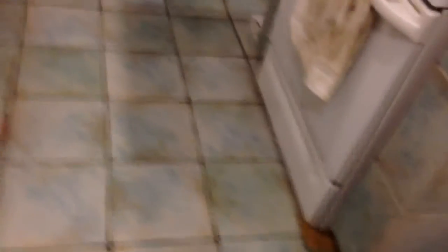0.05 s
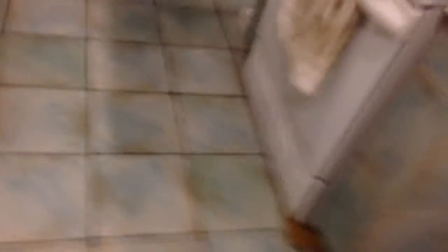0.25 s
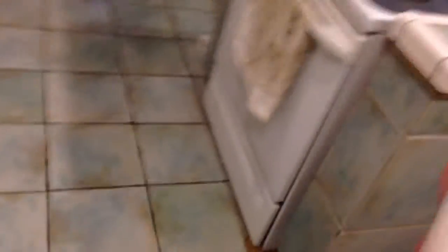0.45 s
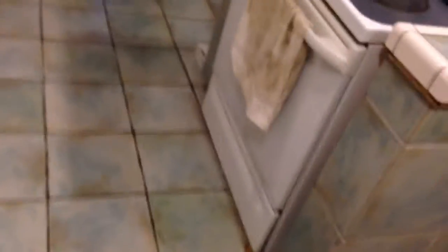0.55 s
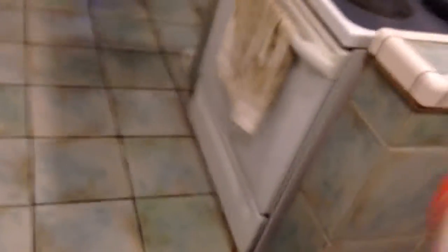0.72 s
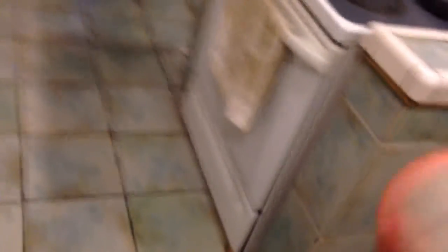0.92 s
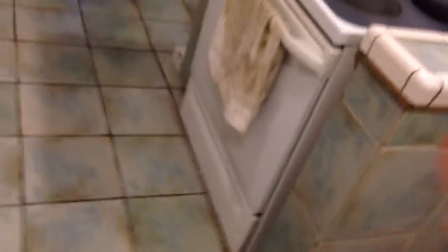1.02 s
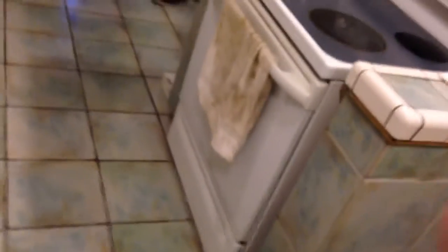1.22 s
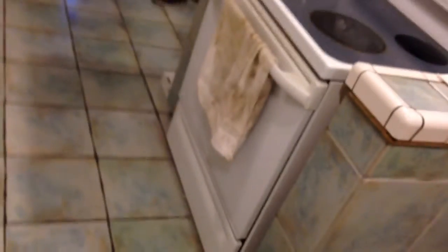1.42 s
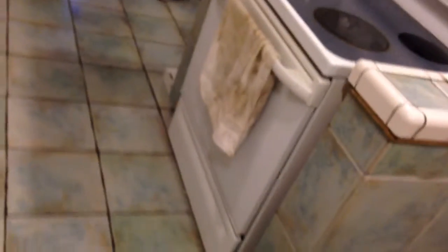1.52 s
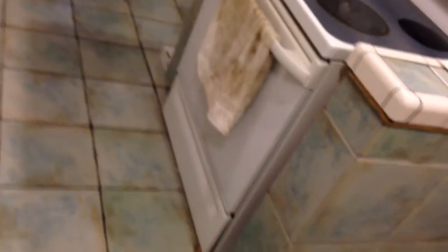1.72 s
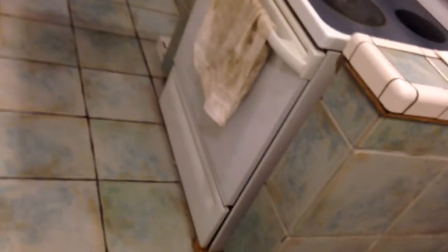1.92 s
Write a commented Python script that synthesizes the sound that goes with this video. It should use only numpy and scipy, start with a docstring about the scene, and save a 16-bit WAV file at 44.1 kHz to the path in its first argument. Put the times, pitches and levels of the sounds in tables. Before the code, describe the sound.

A plastic container is shaken close to the microphone in a tiled kitchen. After a scrape and soft bump, hard pieces clack and slide inside, over hand rubbing and hollow knocks. The rattle weakens and ends in faint clicks.

```python
"""A scrape and a soft bump open a burst of hard clacks: a plastic container shaken close to the
microphone in a tiled kitchen. Hard pieces inside strike the walls and ring them briefly, sliding and
skidding between blows. The hand rubs the hollow body, which knocks from the hand or under a hard clack.
The shaking stops and a last few faint clicks follow over the hush of the room."""
import sys
import numpy as np
from scipy import signal
from scipy.fft import rfft, irfft, next_fast_len
from scipy.io import wavfile

SR = 44100
rng = np.random.default_rng(int(sys.argv[2]) if len(sys.argv) > 2 else 0)


def waveform_to_disk(signal):
    """Save audio, clipped to [-1, 1], as 16-bit WAV at the path in sys.argv[1]."""
    frames = np.transpose(np.atleast_2d(signal))
    scaled = np.clip(frames, -1, 1) * 32767
    samples = np.round(scaled).astype(np.int16)
    wavfile.write(sys.argv[1], SR, samples)


N = 85995

# clacks on the wall (time [s], low and high resonance of the struck spot [Hz],
# level in each of the four CLACK_BANDS [dB], room send [dB]);
# the one at 0.308 s is mostly room ring after the loud clack
WALL_CLACKS = [(0.1198, 1775, 4140, -19.5, -21.5, -20.5, -42, 5.5),
               (0.1427, 1980, 4200, -19.5, -17, -12, -17.5, -17),
               (0.1651, 2050, 5500, -45, -18.5, -10.5, -16, -27),
               (0.175, 2230.0, 3930, -37, -21, -15.5, -21, -26),
               (0.2192, 1670, 4830.0, -25, -7, -1, -16, -30),
               (0.2267, 1610, 4900, -22.5, -10.5, -3, -8, -9.5),
               (0.2685, 1970, 4950, -36, 0.5, 2.5, -8, -6.5), (0.2699, 2180, 3735, -33, -0.5, 4.5, -1, -4),
               (0.2744, 2700, 3290, -21, 0.5, -12, -15, -6.5), (0.2761, 2740, 3330, -29, -16, -3, -14, -7),
               (0.308, 2390, 4220, -42, -11.5, -13, -24, 4),
               (0.3453, 2760, 5630, -19, -12, -10.5, -13.5, -24),
               (0.3748, 1900, 4140, -26, -12, -5.5, -12.5, -15),
               (0.4405, 1670, 4700, -38, -11, -8, -15.5, 0.5), (0.46, 1820, 4400, -35, -16, -8.5, -19, -9),
               (0.47, 2760, 5380.0, -47, -34, -21, -22, -8), (0.522, 2200, 4550, -44, -10, -5.5, -12, -6),
               (0.5466, 2550, 3700, -32.5, -3.5, -8.5, -12.5, -4.5),
               (0.5485, 1680, 3750, -21, -4.5, -10, -16, -2), (0.5594, 1650, 3500, -35, -9, -11, -21, -10),
               (0.568, 1380, 3760, -16, -11, -18, -19, -11), (0.6195, 2190, 5540.0, -19, 3, 10, 6, -14),
               (0.6312, 2220, 5320.0, -20.5, -9.5, -9.5, -12, -17),
               (0.691, 3260, 5750, -24, -9.5, -3, -8, -4.5),
               (0.7547, 2360, 3660, -61, -4.5, -8, -18.5, 0.5),
               (0.7642, 2570, 4460, -32, -8, -10.5, -18, -1.5),
               (0.78, 1700, 4830, -25, -37.5, -13, -18, 1.5), (0.8534, 1970, 4730, -18, 3.5, 5, 0.5, -13),
               (0.8608, 1780, 5950, -32, -11, -18, -16, -14),
               (0.9335, 2600, 4900, -29, -18, -7.5, -16, -14),
               (0.937, 1930, 4570, -23, -13, -11.5, -14.5, 0),
               (0.9773, 2180, 2320, -21, 0.6, -9.5, -13.5, -5.5),
               (0.9834, 2020, 4000, -25, -12, -10, -20, -0.5),
               (1.0407, 2110.0, 4000, -25.5, -18, -14, -13.5, -16),
               (1.0943, 1534, 6000, -24, -44, -19.5, -27, -13),
               (1.1148, 2470, 3400, -49, -13.5, -13, -20.5, 0.5),
               (1.1257, 2580, 3370, -26.5, -12, -7.5, -12.5, -17),
               (1.1517, 2070, 5800, -48, -15, -13.5, -15.5, -8.5),
               (1.2287, 2020, 4200, -31, -16, -13.5, -21.5, -39),
               (1.2483, 3190, 3730, -33, -10, -7.5, -17.2, -19),
               (1.252, 2630, 3940, -17.5, -7.5, -7.5, -15, -7),
               (1.2895, 1840, 4100, -29, -15.5, -18.5, -31, -11.5),
               (1.3283, 2570, 3500, -33, -17, -20.5, -18, -15),
               (1.3716, 1830, 5460, -36, -20.5, -18.5, -24.5, -26),
               (1.4021, 1960, 6100, -27, -23.5, -23, -47, -1.5),
               (1.5076, 2220, 2750, -32.5, -18, -19.5, -26.5, -5.5),
               (1.5523, 2095, 4610.0, -41.5, -36.5, -34, -39.5, 0.5),
               (1.823, 1840, 2960, -41.5, -35.5, -43, -52.5, -4.5)]
# body, knock, bite and air of a clack (low edge [Hz], high edge [Hz])
CLACK_BANDS = [(250, 850), (1400, 3200), (3200, 7000), (7000, 15000)]
# modes of the plastic wall (frequency [Hz], level [dB], t60 [s])
WALL_MODES = [(362, -26.5, 0.026), (506, -15, 0.018), (1458, -36, 0.0071), (1772, -8.5, 0.046),
              (2028, -5, 0.049), (2418, -10.5, 0.02), (3160, -14.5, 0.0028), (4490, -6.5, 0.0082),
              (5050, -1.5, 0.0038), (8000, -1, 0.0025), (9310, -0.5, 0.0032), (12000, -0.5, 0.0012)]
MODE_SCATTER_DB, TUNE_SCATTER = 2, 0.025
SPOT_DB, SPOT_T60_CYCLES = (11, 9), (15, 22)  # low and high resonance
SPOT_DB_PER_DB = 0.17  # harder blows ring the spot more
SNAP_DB, ROOM_SNAP_DB = 8.5, 18
CHATTER_DB, CHATTER_T60_S, CHATTER_PER_S = -8, 0.016, 5300

# contents sliding along the wall (start [s], length [s], level [dB])
SLIDE_STROKES = [(0, 0.03, -46.5), (.033, 0.025, -46), (.058, 0.046, -58.5), (.135, 0.079, -53),
                 (.222, 0.046, -42.5), (.278, .065, -41.5), (.345, 0.012, -43), (.442, 0.014, -38),
                 (.525, 0.042, -45.5), (.548, 0.034, -39.5), (.585, 0.042, -42), (.70, 0.15, -53),
                 (.94, 0.034, -53.5), (.995, 0.085, -48), (1.145, 0.021, -69), (1.2, 0.07, -49.5),
                 (1.255, 0.036, -45), (1.3, 0.038, -45.5), (1.37, 0.024, -55.5)]
# gritty tone of the scrape (frequency [Hz], gain [dB])
SCRAPE_EQ = [(200, -32), (900, -7.5), (1300, -2), (1800, 1), (2350, -1.5), (3000, -4.5), (4200, -4),
             (5500, -7.5), (7500, -15), (10000, -22), (15000, -29)]
# bright tone of the ticks within it (frequency [Hz], gain [dB])
TICK_EQ = [(500, -26), (2000, -7), (4800, 3.5), (9500, -9.5), (15000, -6.5)]
SLIDE_GRAINS_PER_S, TICKS_PER_S, TICK_DB = 1500, 220, -9
# a piece skidding on the wall (start [s], length [s], level [dB], resonance [Hz])
SKID_STROKES = [(0.031, 0.0055, -39, 3790), (0.216, 0.028, -39.5, 1853), (0.275, 0.029, -31.5, 2270),
                (0.543, 0.015, -36, 2670), (0.563, 0.067, -42, 1770), (0.748, 0.0098, -40.5, 2340),
                (0.934, 0.0053, -32, 4630), (1, 0.064, -48.5, 2350), (1.109, 0.025, -37.5, 2820),
                (1.245, 0.015, -45.5, 3560), (1.387, .11, -63.5, 3050)]
SKID_Q = 5

# the hand rubbing the body (start [s], length [s], level [dB])
RUB_STROKES = [(0, 0.029, -47), (.06, .035, -53.5), (.097, 0.0097, -42), (.116, 0.046, -44),
               (.18, 0.016, -46), (.235, 0.12, -45.5), (.355, 0.018, -34), (.39, 0.017, -43.5),
               (.445, 0.071, -47), (.55, 0.054, -46), (.59, 0.035, -39.5), (.69, 0.1, -51.5),
               (.805, 0.064, -43.5), (.847, 0.033, -43), (.935, 0.042, -48.5), (1.04, 0.029, -54.5),
               (1.062, 0.0087, -41), (1.135, 0.028, -49), (1.198, 0.029, -49), (.99, 0.013, -60),
               (1.338, 0.008, -43)]
# hollow tone of the rub (frequency [Hz], gain [dB])
RUB_EQ = [(25, -22), (60, -11.5), (120, -5.5), (240, 1), (285, -3), (360, 8.5), (440, -6), (505, 1.5),
          (620, -4), (1100, -6), (2000, -10), (5000, -36.5), (15000, -57.5)]
# the grip rumbling as the arm reverses (start [s], length [s], level [dB])
GRIP_STROKES = [(.02, 0.032, -69), (.11, 0.057, -48.5), (.31, 0.022, -56.5), (.59, 0.051, -52),
                (.8, 0.092, -54.5), (1.06, 0.029, -50), (1.2, 0.085, -55), (1.34, 0.019, -57)]
# bassy tone of the grip (frequency [Hz], gain [dB])
GRIP_EQ = [(25, -10.5), (60, -6.5), (110, -2.5), (180, 2), (300, -23.5), (1000, -44.5), (15000, -81.5)]
RUB_GRAINS_PER_S, HAND_ATTACK_S, HAND_RELEASE_S = 1300, 0.0081, 0.018
# knocks of the hollow body (time [s], peak [dB], starting pitch [Hz], ring length [cycles])
BODY_KNOCKS = [(.006, -34.5, 248, 1), (0.031, -37, 142, 1.1), (0.121, -41.5, 100.2, 1),
               (0.15, -41.5, 195.3, 2), (0.237, -27.5, 282, 1), (.269, -33, 775, 5), (0.2685, -32, 1095, 6),
               (.508, -24, 232.4, 1), (0.519, -44.5, 98, 1), (.567, -29.5, 950, 3), (0.853, -31.5, 534, 3),
               (1.215, -33.5, 350, 1.76), (1.343, -36.5, 452, 1), (1.342, -35.5, 1215, 5.7)]
KNOCK_SAG = 0.41  # the pitch falls, most in the shortest knocks, where the palm settles

# decay of the tiled room (frequency [Hz], t60 [s])
ROOM_DECAY = [(100, 0.26), (500, 1.85), (2200, 0.67), (2650, 0.51), (3100, 1.1), (3700, 0.62), (6000, 0.56),
              (14000, 0.49)]
# tone of the reverb (frequency [Hz], gain [dB])
ROOM_EQ = [(100, -7), (1000, -3.5), (2200, 0.5), (5000, -1), (9000, -2.5), (15000, -1.5)]
EARLY_DB, EARLY_T60_S, HANDLING_SEND_DB = 13.5, 0.045, -8
# room hush and hiss (frequency [Hz], gain [dB])
HUSH_EQ = [(25, -5), (60, -9.5), (150, -13), (500, -14), (900, -24.5), (2000, -22), (5000, -24),
           (10000, -27.5), (15000, -19.5)]
HUSH_DB = -62.5
# microphone response (frequency [Hz], gain [dB])
MIC_EQ = [(20, -34), (35, -11), (60, -4.5), (100, -2.5), (8000, -0.5), (10500, -0.5), (13000, -6.5),
          (15500, -11)]
CLIP_LEVEL, TOP_HZ = 0.45, 15400


def clacks():
    """Each clack snaps, chatters and rings the wall; the room hears it as one smooth click."""
    out, t = np.zeros(N), np.arange(SR // 20) / SR
    mode_hz, mode_db, t60 = np.transpose(WALL_MODES)[:, :, None]
    snap = t == 0
    for start, low_hz, high_hz, *levels, send_db in WALL_CLACKS:
        detune, strength = rng.standard_normal((2, len(WALL_MODES), 1))
        decay = amp(mode_db + MODE_SCATTER_DB * strength - 60 * t / t60)
        ring = (decay * np.cos(2 * np.pi * mode_hz * (1 + TUNE_SCATTER * detune) * t)).sum(0)
        force_db = SPOT_DB_PER_DB * max(levels)
        for hz, db, cycles in zip((low_hz, high_hz), SPOT_DB, SPOT_T60_CYCLES):
            ring += amp(db + force_db - 60 * t * hz / cycles) * np.cos(2 * np.pi * hz * t)
        chatter = amp(CHATTER_DB - 60 * t / CHATTER_T60_S) * contacts(CHATTER_PER_S, len(t))
        direct = rebounding(ring + chatter + amp(SNAP_DB) * snap)
        add(out, start, balanced(direct, levels))
        click = balanced(ring + amp(ROOM_SNAP_DB) * snap, levels)
        add(out, start, amp(send_db) * kitchen(click))
    return out


def rebounding(x, count=4, db=-8, lag_s=(0.0002, 0.002), low_cut_hz=2500):
    """A piece lands on one edge and totters through a few lighter, unevenly spaced contacts."""
    lags = np.round(rng.uniform(*lag_s, count) * SR).astype(int)
    sizes = amp(db) * rng.choice([-1, 1], count)
    light = signal.sosfilt(signal.butter(1, low_cut_hz, "high", fs=SR, output="sos"), x)
    return x + sum(size * np.pad(light, (lag, 0))[:len(x)] for size, lag in zip(sizes, lags))


def balanced(x, levels):
    """Voice a clack by setting its energy in each band."""
    filters = [signal.butter(3, band, "band", fs=SR, output="sos") for band in CLACK_BANDS]
    parts = [signal.sosfilt(sos, x) for sos in filters]
    return sum(amp(db) * part / np.linalg.norm(part) for db, part in zip(levels, parts))


def slides():
    """Tiny contacts of very uneven size over a fine scrape as the contents shift."""
    scrape = coloured(contacts(SLIDE_GRAINS_PER_S, N) + rng.standard_normal(N), SCRAPE_EQ)
    ticks = coloured(contacts(TICKS_PER_S, N), TICK_EQ)
    return (scrape + amp(TICK_DB) * ticks) * strokes(SLIDE_STROKES, attack_s=0.005, release_s=0.015)


def skids():
    """Fast stick and slip makes one resonance of the wall sing."""
    out = np.zeros(N)
    for start, length, db, hz in SKID_STROKES:
        damping = 1j * hz / SKID_Q
        friction = contacts(CHATTER_PER_S, N)
        sing = filtered(friction, lambda f: (damping * f / (hz * hz - f * f + damping * f)) ** 2)
        out += unit(sing) * strokes([(start, length, db)], attack_s=0.0012, release_s=0.003)
    return out


def hand():
    """Grainy rubbing sounds through the hollow body, over the low rumble of the grip."""
    rub = coloured(contacts(RUB_GRAINS_PER_S, N), RUB_EQ)
    grip = coloured(rng.standard_normal(N), GRIP_EQ)
    return (rub * strokes(RUB_STROKES, HAND_ATTACK_S, HAND_RELEASE_S)
            + grip * strokes(GRIP_STROKES, HAND_ATTACK_S, HAND_RELEASE_S))


def knocks():
    """Short hollow knocks of the body, from the hand or under a hard clack, sagging in pitch."""
    out, t = np.zeros(N), np.arange(SR // 10) / SR
    for start, db, hz, cycles in BODY_KNOCKS:
        age = hz * t / cycles  # in ring lengths
        pitch = hz / (1 + KNOCK_SAG * age / cycles)
        knock = np.sin(2 * np.pi * np.cumsum(pitch) / SR) * np.sqrt(age) * np.exp(-2 * age)
        add(out, start, amp(db) * knock / np.abs(knock).max())
    return out


def kitchen(x):
    """The tiles answer with dense early reflections, then a tail that is shorter in the treble."""
    hz, t, noise = signal.stft(rng.standard_normal(SR), SR, nperseg=256)
    decay = amp(-60 * t / along(ROOM_DECAY, hz)[:, None]) + amp(EARLY_DB - 60 * t / EARLY_T60_S)
    tail = signal.istft(noise * decay, SR, nperseg=256)[1]
    tail = equalised(tail / np.linalg.norm(tail), ROOM_EQ)
    fade_in = np.clip(np.arange(len(tail)) / SR / 0.00057, 0, 1)
    return signal.fftconvolve(x, tail * fade_in)


def hush():
    """A steady bed of low room tone and faint hiss."""
    return amp(HUSH_DB) * coloured(rng.standard_normal(N), HUSH_EQ)


def contacts(per_s, samples):
    """A crackle of tiny random impacts, at rms 1."""
    return unit((rng.random(samples) < per_s / SR) * rng.standard_normal(samples))


def strokes(rows, attack_s, release_s):
    """One attack, hold and release per (start [s], length [s], level [dB]) row, summed in power."""
    t, power = np.arange(N) / SR, np.zeros(N)
    for start, length, db in rows:
        rise = np.clip((t - start) / attack_s, 0, 1)
        fall = np.exp(-np.maximum(t - start - length, 0) / release_s)
        power += (amp(db) * rise * fall) ** 2
    return np.sqrt(power)


def amp(db):
    """Decibels to gain."""
    return 10 ** (np.asarray(db) / 20)


def unit(x):
    """x at rms 1."""
    return x / np.sqrt(np.mean(x ** 2) + 1e-20)


def along(points, hz):
    """Read a (frequency [Hz], value) curve on a log frequency axis."""
    freqs, values = np.transpose(points)
    return np.interp(np.log(hz + 1), np.log(freqs + 1), values)


def filtered(x, response):
    """x through a frequency response."""
    size = next_fast_len(len(x) + 8192)
    return irfft(rfft(x, size) * response(np.fft.rfftfreq(size, 1 / SR)), size)[:len(x)]


def equalised(x, eq):
    """x through an EQ curve."""
    return filtered(x, lambda hz: amp(along(eq, hz)))


def coloured(x, eq):
    """x through an EQ curve, at rms 1."""
    return unit(equalised(x, eq))


def add(out, start, x):
    """Mix x into out from start [s]."""
    i = max(0, round(start * SR))
    out[i:i + len(x)] += x[:N - i]


def scene():
    """Clacks up front, handling noise with its reverb beneath them, room tone behind; mono."""
    handling = slides() + skids() + hand() + knocks()
    bed = hush()
    return (clacks() + handling + amp(HANDLING_SEND_DB) * kitchen(handling)[:N] + bed)[None]


def record(dry):
    """The microphone thins lows and highs, a soft clip rounds the hardest clacks, the top is cut off."""
    x = equalised(dry[0], MIC_EQ)
    x = x / (1 + (x / CLIP_LEVEL) ** 6) ** (1 / 6)
    return filtered(x, lambda hz: 1 / np.sqrt(1 + (hz / TOP_HZ) ** 90))[None]


dry = scene()
out = record(dry)
waveform_to_disk(out)
```